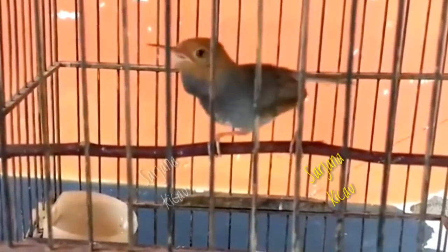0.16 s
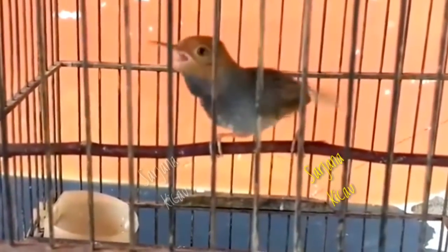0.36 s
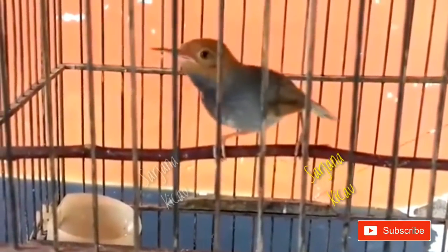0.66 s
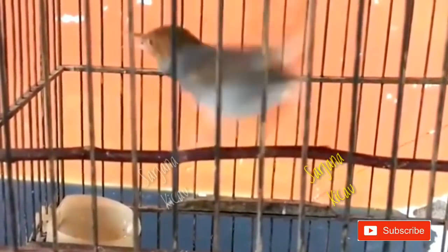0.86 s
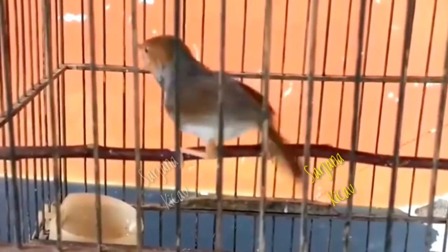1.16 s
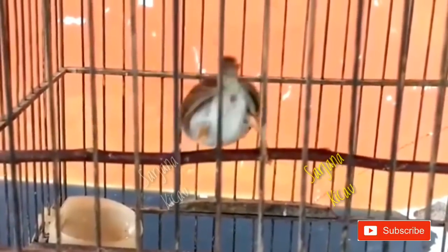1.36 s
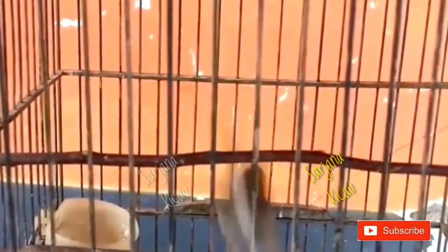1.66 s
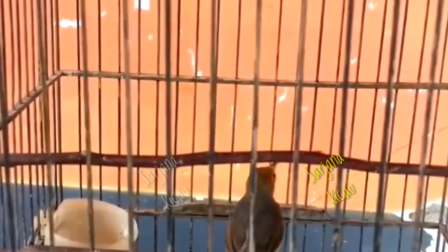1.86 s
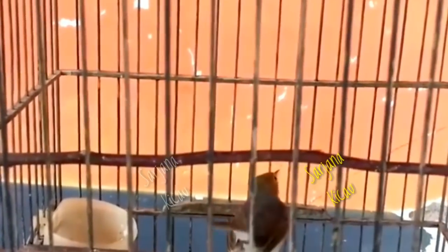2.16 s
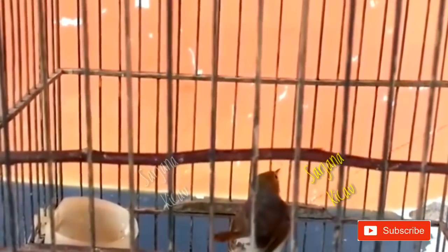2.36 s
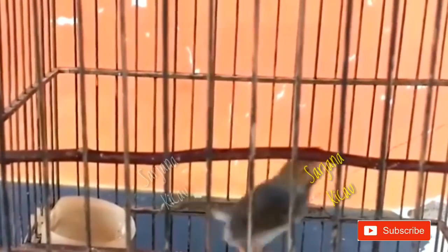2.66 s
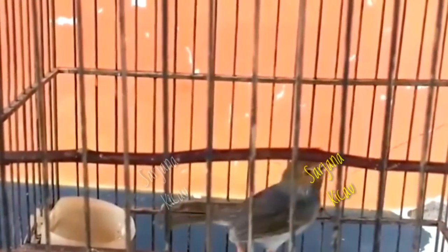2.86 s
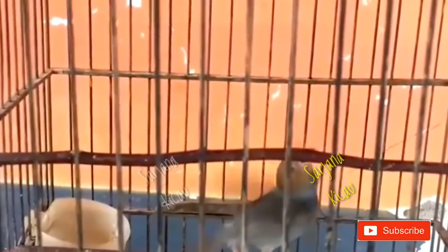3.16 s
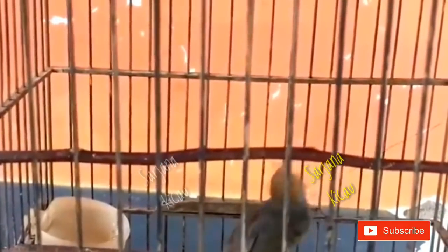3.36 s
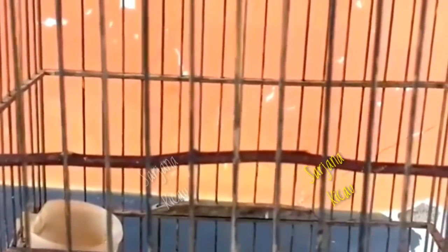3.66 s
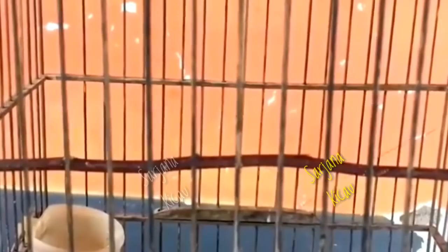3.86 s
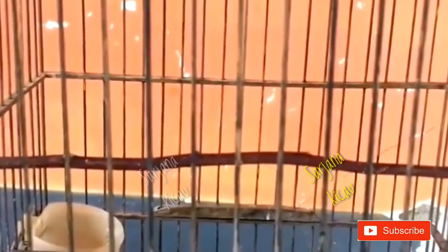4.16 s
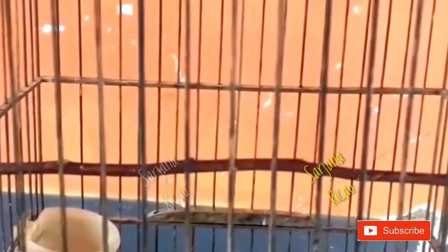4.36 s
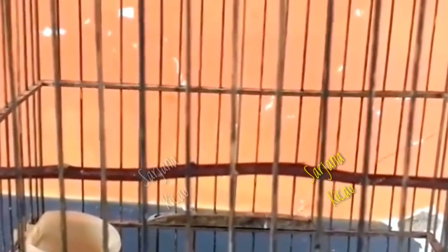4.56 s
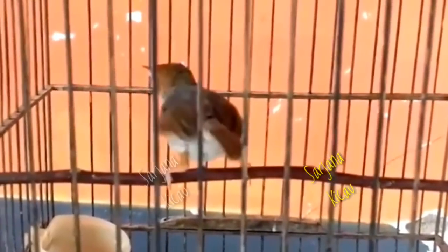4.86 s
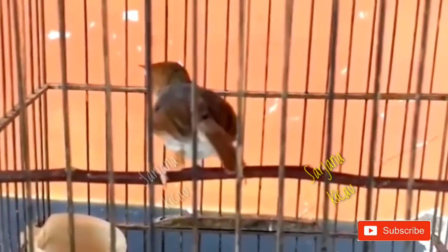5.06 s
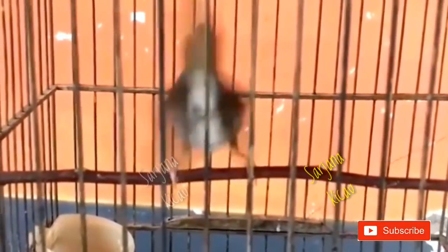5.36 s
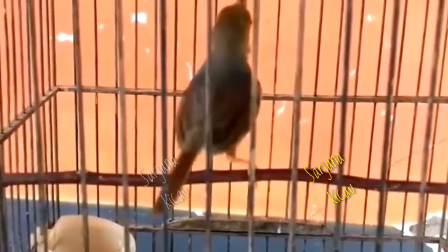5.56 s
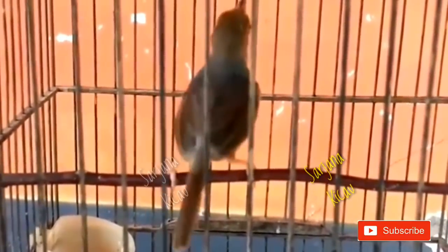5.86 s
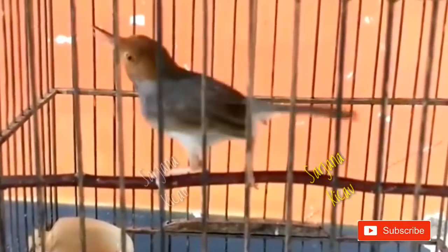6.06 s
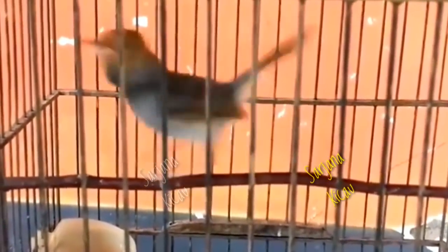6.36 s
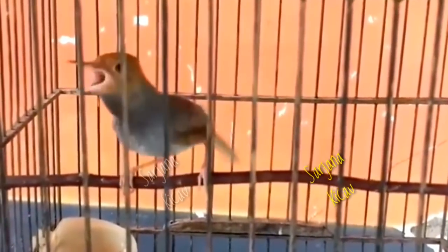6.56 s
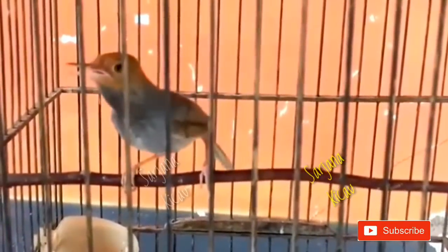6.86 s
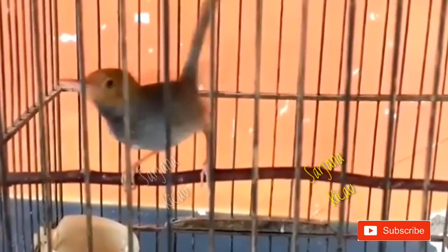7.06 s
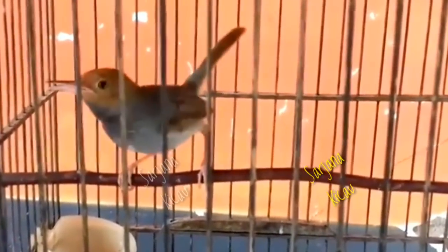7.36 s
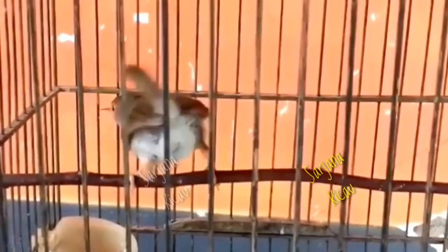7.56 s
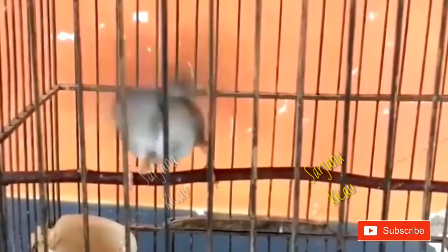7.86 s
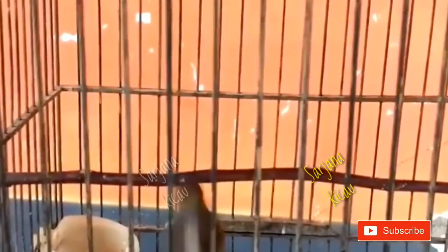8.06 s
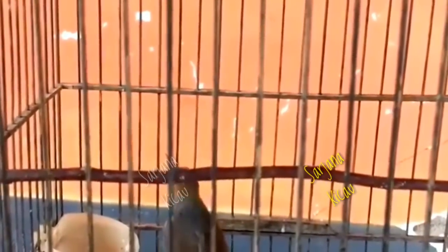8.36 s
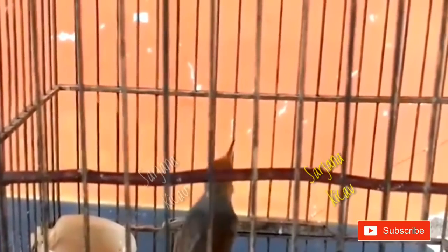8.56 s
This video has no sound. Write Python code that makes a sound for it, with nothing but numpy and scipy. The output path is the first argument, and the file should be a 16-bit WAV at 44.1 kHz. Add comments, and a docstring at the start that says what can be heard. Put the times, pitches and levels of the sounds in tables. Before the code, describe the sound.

Short, piercing songbird phrases, each a tick, rattling trill, whistle and swooping chirp, ring in a hard porch, with bill clicks and soft wing flutters.

```python
"""Caged songbird in a hard-walled porch

A small tailorbird sings close by: ticks, trills, whistles, dips, slurs and arches, each a nearly pure tone
steered along a pitch curve. Noise bursts make its bill clicks and the rasp of its trills; pressure pulses make
its wing beats. The porch echoes song and clicks, and loud notes saturate. Far off, harmonic tones make a dog's
barks and another bird's cries, falling tones make chirps, and filtered noise makes twittering and outdoor air."""
import sys
import numpy as np
from scipy import signal
from scipy.fft import rfft, irfft, next_fast_len
from scipy.io import wavfile

SR = 44100
rng = np.random.default_rng(int(sys.argv[2]) if len(sys.argv) > 2 else 0)


def master_out(mix):
    """Clip the mix to full scale and print it as 16-bit PCM to the path in sys.argv[1]."""
    frames = np.transpose(np.atleast_2d(mix))
    ceiling = np.clip(frames, -1, 1)
    pcm = np.round(ceiling * 32767).astype(np.int16)
    wavfile.write(sys.argv[1], SR, pcm)


N = 384111

# trills, sung and breathed together: onset t/s, length t/s, initial floor of the pitch f/Hz, relative level/dB
TRILL_NOTES = [(.23, .152, 2385, -6.5), (1.149, .144, 2470, -6.8), (3.118, .151, 2335, -4.8),
               (3.994, .129, 2510, -8.5), (5.594, .15, 2375, -6), (6.533, .137, 2450, -9.5),
               (8.336, .15, 2320, -6)]


def from_db(db):
    """Amplitude ratio: 20 dB is a factor of ten."""
    return 10 ** (np.asarray(db) / 20)


def rms_one(x):
    """Normalisation to unit mean power."""
    return x / np.sqrt(np.mean(x ** 2) + 1e-20)


def seconds(length):
    """Sampled time axis of a sound lasting length seconds."""
    return np.arange(int(length * SR)) / SR


def along(rows, t):
    """Linear interpolation: the columns of a curve, read at times t."""
    times, *columns = np.transpose(rows)
    return [np.interp(t, times, column) for column in columns]


def add(out, s, sound):
    """Superposition: mix a sound in at time s."""
    i = max(round(s * SR), 0)
    out[i:i + len(sound)] += sound[:max(len(out) - i, 0)]


def colour(x, points):
    """Linear filtering: scale each frequency by a curve through points of f/Hz, gain/dB."""
    size = next_fast_len(len(x))
    hz, db = np.transpose(points)
    bins = np.maximum(np.arange(size // 2 + 1) * SR / size, 1)
    gain = from_db(np.interp(np.log(bins), np.log(hz), db))
    return irfft(rfft(x, size) * gain, size)[:len(x)]


def noise(points, size=N):
    """Random pressure: white noise shaped by a spectrum, at unit mean power."""
    return rms_one(colour(rng.standard_normal(size), points))


def waver(t, per_s):
    """Random modulation: straight lines joining per_s normal random values each second."""
    knots = rng.standard_normal(int(t[-1] * per_s) + 2)
    return np.interp(t * per_s, np.arange(len(knots)), knots)


def phase_of(hz):
    """Phase is the running integral of frequency."""
    return 2 * np.pi * np.cumsum(hz) / SR


def envelope(t, attack, release):
    """Amplitude modulation: linear attack, hold, linear release."""
    return np.clip(t / attack, 0, 1) * np.clip((t[-1] - t) / release, 0, 1)


def low_pass(x, cutoff_hz):
    """Steep Butterworth attenuation above the cutoff."""
    filter_sections = signal.butter(8, cutoff_hz, fs=SR, output="sos")
    return signal.sosfilt(filter_sections, x + 1e-18)   # the offset avoids denormal numbers


def tail(t60):
    """Diffuse reverberation: noise of unit energy, built up in milliseconds and falling 60 dB in t60."""
    t = seconds(.8)
    build_up = 1 - np.exp(-(t / .007) ** 2)
    echo = rng.standard_normal(len(t)) * from_db(-60 * t / t60) * build_up
    return echo / np.sqrt(np.sum(echo ** 2))


def song():
    """Superposition of all the kinds of note."""
    # tick shape before scaling: t/s from onset, pitch f/Hz, relative level/dB
    tick_shape = [(0, 5804, -30), (.003, 5534, -6), (.006, 4897, -2.5), (.009, 4150, 4.5),
                  (.012, 3080, -10), (.016, 2500, -16), (.02, 2309, -38)]
    # ticks: onset t/s, duration ratio, pitch ratio, relative level/dB
    tick_notes = [(.2112, .82, .963, -.5), (1.1312, .95, .99, -7), (3.1005, .9, .966, -3.5),
                  (3.9752, .85, .916, -2.5), (5.5752, 1.05, .977, -2.5), (6.5138, .8, .93, -2.5),
                  (8.3045, .88, .97, -.5), (8.594, 1.04, .896, -5), (8.631, 1.6, .9, -12),
                  (8.671, 1.5, .92, -13)]
    # dips: onset t/s, pitch ratio, relative hook level/dB, relative swoop level/dB
    dip_notes = [(.55, 1, -1, -6), (1.449, .994, 0, -4), (3.432, .98, -.5, -2.5), (4.282, .99, 0, -1.5),
                 (5.8962, 1, -1, -2.5), (6.8253, 1, 0, -1.5), (8.644, .92, -1, -5.5)]
    # arches: onset t/s, pitch ratio, relative hook level/dB, relative swoop level/dB
    arch_notes = [(.764, 1, -6, -2.5), (3.888, .972, -3.5, -4.5), (6.438, .955, -7.5, -7.5)]
    ticks = sing(tick_shape, tick_notes, jitter=.04, shimmer_db=3.5)
    # a dip has a long hook and a low crest; an arch has a short hook and a high crest
    dips = swoops(dip_notes, hook_s=.026, delay_s=.029, rise_s=.022, fall_s=.05, crest_hz=3060)
    arches = swoops(arch_notes, hook_s=.016, delay_s=.035, rise_s=.028, fall_s=.04, crest_hz=3430)
    return ticks + trills() + whistles() + dips + arches + slurs()


def tone(hz, db, jitter, shimmer_db, octave_db=-46.5):
    """The syrinx as an oscillator: a sine and a weak octave, randomly modulated in pitch and level."""
    t = np.arange(len(hz)) / SR
    phase = phase_of(hz * (1 + jitter * waver(t, 600)))
    level = from_db(db + shimmer_db * waver(t, 150))
    return level * (np.sin(phase) + from_db(octave_db) * np.sin(2 * phase))


def sing(shape, notes, jitter, shimmer_db):
    """Frequency modulation along one learned shape, a little different each time."""
    out = np.zeros(N)
    for s, stretch, pitch, level_db in notes:
        t = seconds(shape[-1][0] * stretch)
        hz, db = along(shape, t / stretch)
        add(out, s, envelope(t, .001, .001) * tone(hz * pitch, db + level_db, jitter, shimmer_db))
    return out


def trills():
    """Periodic closure of the syrinx: pitch leaps in each gap, and the leaps shrink as the trill swells."""
    rate_hz, swing_hz, sag_hz = 61.3, 2400, 130   # the pitch floor sags toward the end
    swell_db, swell_share = 10.5, .66   # growth in level, over this share of the length
    closure_db, pulsed_share = 30, .87   # greatest depth of the gaps; the last pulses run together
    out = np.zeros(N)
    for s, length, low_hz, db in TRILL_NOTES:
        t = seconds(length)
        done = t / length
        lift = .5 - .5 * np.cos(2 * np.pi * rate_hz * t)
        hz = low_hz - sag_hz * done ** 2 + swing_hz * (1 - done ** 1.3) * lift ** 2
        swell = swell_db * np.minimum(done / swell_share - 1, 0)
        closure = closure_db * np.maximum(np.sin(np.pi * done / pulsed_share), 0) ** .5
        voice = tone(hz, db + swell - closure * lift, jitter=.026, shimmer_db=1.8, octave_db=-25.5)
        add(out, s, envelope(t, .001, .016) * voice)
    return low_pass(out, 5450)   # the throat damps the top


def whistles():
    """Nearly steady oscillation: short, loud, clean notes that rise slightly."""
    # whistles: onset t/s, length t/s, starting pitch f/Hz, relative level/dB
    whistle_notes = [(.4424, .046, 3355, 1), (1.3431, .043, 3345, 2), (3.326, .05, 3405, 1.5),
                     (4.176, .046, 3385, 2), (5.791, .045, 3325, 2.5), (6.7212, .046, 3360, 1.5),
                     (8.536, .053, 3355, -.5)]
    rise_hz_per_s = 3800
    out = np.zeros(N)
    for s, length, start_hz, db in whistle_notes:
        t = seconds(length)
        voice = tone(start_hz + rise_hz_per_s * t, db, jitter=.001, shimmer_db=.75)
        add(out, s, envelope(t, .002, .009) * voice)
    return out


def low_voice(hz, pitch, db):
    """Pitch-dependent strength: a rougher tone that weakens at the bottom of its range."""
    full_voice_hz, loss_db_per_hz = 2850, .021   # full strength above this unscaled pitch
    loss_db = loss_db_per_hz * np.maximum(full_voice_hz - hz, 0)
    return tone(hz * pitch, db - loss_db, jitter=.014, shimmer_db=3.2)


def swoops(notes, hook_s, delay_s, rise_s, fall_s, crest_hz):
    """Frequency glides: a falling hook, then a swoop up to a crest and partly down again."""
    # pitches before each note's ratio
    hook_hz, hook_fall_hz_per_s = 3300, 64000
    from_hz, to_hz = 1400, 2560
    fade_db = 3   # weakening after the crest
    out = np.zeros(N)
    for s, pitch, hook_db, swoop_db in notes:
        t = seconds(hook_s)
        hook = low_voice(hook_hz - hook_fall_hz_per_s * t, pitch, hook_db)
        add(out, s, envelope(t, .003, .005) * hook)
        t = seconds(rise_s + fall_s)
        up = from_hz + (crest_hz - from_hz) * np.sin(np.pi / 2 * t / rise_s)
        down = to_hz + (crest_hz - to_hz) * np.cos(np.pi / 2 * (t - rise_s) / fall_s) ** 2
        fade = fade_db * np.maximum(t - rise_s, 0) / fall_s
        swoop = low_voice(np.where(t < rise_s, up, down), pitch, swoop_db - fade)
        add(out, s + delay_s, envelope(t, .003, .014) * swoop)
    return out


def slurs():
    """Exponential relaxation of pitch: an upward flick, a break, then a note settling from above."""
    # slurs: onset t/s, length of the held part t/s, held pitch f/Hz, relative start level/dB, end level/dB
    slur_notes = [(.554, .143, 3700, -4, -18), (3.666, .142, 3690, -2, .5), (6.22, .161, 3720, -3, -10)]
    flick_s, flick_from_hz, flick_to_hz, flick_db = .013, 2700, 4400, 2.5
    delay_s, overshoot_hz, settle_s = .0235, 1120, .018
    push_db, push_before_end_s, push_width_s = 8, .028, .018   # a last push of air
    out = np.zeros(N)
    for s, length, held_hz, start_db, end_db in slur_notes:
        t = seconds(flick_s)
        flick_hz = np.linspace(flick_from_hz, flick_to_hz, len(t))
        flick = tone(flick_hz, start_db + flick_db, jitter=.004, shimmer_db=1.1)
        add(out, s, envelope(t, .01, .003) * flick)
        t = seconds(length)
        push = push_db * np.exp(-((length - push_before_end_s - t) / push_width_s) ** 2)
        db = np.linspace(start_db, end_db, len(t)) + push
        hz = held_hz + overshoot_hz * np.exp(-t / settle_s)
        held = tone(hz, db, jitter=.0036, shimmer_db=1.1)
        add(out, s + delay_s, envelope(t, .003, .012) * held)
    return out


def rasp():
    """Turbulence: air rushing through the syrinx makes band noise that fades through each trill."""
    # spectrum of the rush: f/Hz, relative level/dB
    rush_spectrum = [(1500, -39.5), (2600, -10), (3500, -2.5), (4400, -0.5), (5400, -6), (6000, -35),
                     (15000, -60.5)]
    rasp_db, fade_db = -23.5, 9.5   # level relative to the trill's, and its loss by the end
    out = np.zeros(N)
    for s, length, _, db in TRILL_NOTES:
        t = seconds(length)
        level = from_db(rasp_db + db - fade_db * t / length)
        add(out, s, level * envelope(t, .012, .012) * noise(rush_spectrum, size=len(t)))
    return out


def bill():
    """Impulsive excitation: each snap is a bright noise burst of milliseconds with a faint ring."""
    # clicks: onset t/s, relative level/dB
    snaps = [(0.0704, -17), (.087, -17), (.102, -13), (.118, -10.5), (0.136, -10), (8.163, -12),
             (8.18, -14), (8.195, -10), (8.211, -17), (8.225, -11)]
    # spectrum of a click before the low-pass: f/Hz, relative level/dB
    snap_spectrum = [(500, -32), (1500, -23), (3300, -13.5), (4200, 8), (5600, -2.5), (6500, -13),
                     (7400, -40.5), (14000, -54)]
    decay_s, ring_db, ring_s = .0018, -15.5, .009
    out, t = np.zeros(N), np.arange(SR // 20) / SR
    fade = np.exp(-t / decay_s) + from_db(ring_db) * np.exp(-t / ring_s)
    for s, db in snaps:
        add(out, s, .45 * from_db(db) * fade * noise(snap_spectrum, size=len(t)))
    return low_pass(out, 6400)


def porch(x):
    """Room impulse response: direct sound, two near reflections, a quick dense echo and a longer faint one."""
    # near surfaces: delay t/s, relative level/dB
    reflections = [(.0043, -18), (.0094, -13)]
    # colour of the diffuse echo: f/Hz, gain/dB
    echo_spectrum = [(100, -9.5), (1200, 5.5), (2500, -5.5), (4200, 1), (5400, 0.5), (7000, -8.5),
                     (15000, -18.5)]
    early = from_db(-8.5) * tail(.25)
    late = from_db(-21) * tail(.5559)
    response = colour(early + late, echo_spectrum)
    response[0] += 1   # direct sound
    for s, db in reflections:
        add(response, s, from_db([db]))
    return signal.oaconvolve(x, response)[:N]


def wings():
    """Near-field air flow: each beat pushes and pulls the air at the microphone and leaves a short draught."""
    # wing beats: t/s, relative level/dB
    beats = [(6.219, -55), (6.29, -44), (6.371, -53.5), (6.439, -55), (6.601, -53.5), (7.736, -46.5),
             (7.827, -37), (7.847, -38.5), (7.884, -41), (7.955, -47), (8.004, -41)]
    # spectrum of the draught: f/Hz, relative level/dB
    draught_spectrum = [(30, -22), (95, 0), (180, -5), (400, -30), (1500, -70)]
    puff_s, draught_db, draught_s = .0015194, -13, .03
    out, t = np.zeros(N), seconds(.15)
    u = np.arange(-SR // 50, SR // 50) / SR / puff_s   # time in puff widths
    puff = 2 * u * np.exp(-u ** 2 / 2)
    draught = np.exp(-t / draught_s) * envelope(t, .008, .02)
    for s, db in beats:
        add(out, s - len(u) / SR / 2, from_db(db) * puff)
        add(out, s, from_db(db + draught_db) * draught * noise(draught_spectrum, size=len(t)))
    return out


def far_dog(rough=.015, pitch_spread=.08):
    """Source and filter: hoarse arched barks and one long whine, heard only as their echo."""
    # bark shape before random pitch changes: t/s from onset, pitch f/Hz, relative level/dB
    bark_shape = [(0, 182.3, -14), (.04, 203.4, 6.5), (.1, 215.7, 1.5), (.16, 204, -4.5), (.23, 180, -25)]
    # resonances of the bark: f/Hz, gain/dB
    bark_spectrum = [(250, -24), (550, -13), (700, -20), (860, 1.5), (1050, 1), (1270, -4.5), (1500, -19.5),
                     (2500, -31.5)]
    # bouts at an even pace: first bark t/s, number of barks, time between barks t/s
    bark_bouts = [(.85, 2, .3), (1.62, 7, .31), (4.38, 5, .31), (5.9, 3, .29), (7.0, 6, .293)]
    # loudness of the barking: t/s, relative level/dB
    bark_loudness = [(.85, -62), (1.15, -59), (1.65, -71.5), (2.5, -68.5), (3.15, -56.5), (5, -62.5),
                     (5.6, -56), (7.6, -60), (8.3, -47.5)]
    # the whine: onset t/s, length t/s, starting pitch f/Hz, ending pitch f/Hz, relative level/dB
    long_whine = (.72, .7, 1035, 990, -59)
    t = seconds(bark_shape[-1][0])
    hz, db = along(bark_shape, t)
    out = np.zeros(N)
    for first, count, period in bark_bouts:
        for s in first + period * np.arange(count):
            # each bark has a pitch of its own
            pitch = 1 + pitch_spread * rng.uniform(-1, 1) + rough * waver(t, 200)
            phase = phase_of(hz * pitch)
            voice = colour(sum(np.cos(k * phase) for k in range(2, 8)), bark_spectrum)
            add(out, s, from_db(along(bark_loudness, s)[0] + db) * rms_one(voice))
    s, length, start_hz, end_hz, db = long_whine
    t = seconds(length)
    whine = tone(np.linspace(start_hz, end_hz, len(t)), db, jitter=.02, shimmer_db=3)
    add(out, s, envelope(t, .12, .2) * whine)
    return signal.oaconvolve(out, tail(.4))[:N]


def far_birds(yard_t60=.48, direct_db=-2):
    """Reverberant distance: cries and falling chirps half lost in echo, over a wash of twittering."""
    # chirp shape before scaling: t/s from onset, pitch f/Hz, relative level/dB
    chirp_shape = [(0, 4706, -13), (.04, 4400, 7), (.085, 4069, 0.5), (.125, 3100, -9.5),
                   (.15, 2800, -26.5)]
    # chirps: onset t/s, duration ratio, pitch ratio, relative level/dB
    chirp_notes = [(1.79, 1.3, .984, -69), (2.26, 1.5, .99, -65), (2.42, 1.3, .973, -69),
                   (2.769, 1.1, .96, -57), (2.92, 1.2, .905, -64), (4.68, 1.4, .85, -62),
                   (7.68, 1.2, .968, -62.5), (7.86, 1.3, .974, -65)]
    # twittering, blurred by distance: t/s, level/dB
    twitter_level = [(0, -63), (1.8, -66), (2.15, -73), (2.7, -65), (5.2, -68), (7.2, -63.5), (8.71, -62)]
    # spectrum of the twittering: f/Hz, relative level/dB
    twitter_spectrum = [(2000, -36.5), (3000, -10), (4000, -3.5), (4600, -5.5), (5500, -25), (7000, -41.5)]
    calls = far_cry() + sing(chirp_shape, chirp_notes, jitter=.028, shimmer_db=4.5)
    echo = signal.oaconvolve(calls, tail(yard_t60))[:N]
    twitter = from_db(along(twitter_level, np.arange(N) / SR)[0]) * noise(twitter_spectrum)
    return from_db(direct_db) * calls + echo + twitter


def far_cry(jitter=.0073, quaver_db=5):
    """Additive synthesis: thin, gliding nasal cries whose high partials quaver separately."""
    # cries: onset t/s, length t/s, starting pitch f/Hz, ending pitch f/Hz, relative level/dB
    cry_notes = [(5.33, .28, 625, 597, -49), (5.66, .135, 577, 599, -45.5), (5.95, .09, 598, 590, -50)]
    # partials: multiple of the pitch, relative level/dB
    cry_partials = [(4, -19), (5, -24), (6, -16), (7, -4), (8, 5.5), (9, -17), (10, -12), (11, -25),
                    (12, -18)]
    fade_s = .06
    out = np.zeros(N)
    for s, length, start_hz, end_hz, db in cry_notes:
        t = seconds(length)
        glide_hz = np.linspace(start_hz, end_hz, len(t))
        phase = phase_of(glide_hz * (1 + jitter * waver(t, 100)))
        voice = np.zeros(len(t))
        for k, partial_db in cry_partials:
            voice += from_db(partial_db + quaver_db * waver(t, 29)) * np.sin(k * phase)
        add(out, s, from_db(db) * envelope(t, fade_s, fade_s) * voice)
    return out


def outdoor_air():
    """Broadband ambience: shaped noise whose level drifts."""
    # spectrum of the background: f/Hz, relative level/dB
    air_spectrum = [(20, -12.5), (45, -7), (70, -3), (100, -5), (200, -9.5), (400, -12), (900, -6),
                    (1500, -11.5), (3000, -21), (6000, -28.5), (11000, -36), (15000, -43)]
    # loudness of the background: t/s, level/dB
    air_loudness = [(0, -62.5), (1.3, -61.5), (1.7, -69), (2.3, -70), (2.9, -57.5), (4.2, -59.5),
                    (4.75, -65.5), (6.3, -55), (7.5, -64.5), (8.71, -51.5)]
    return from_db(along(air_loudness, np.arange(N) / SR)[0]) * noise(air_spectrum)


def scene():
    """Superposition: the bird in its porch, with the neighbourhood behind it."""
    bird = porch(song() + rasp() + bill())
    return (bird + wings() + far_dog() + far_birds() + outdoor_air())[None]


def record(dry):
    """Saturation: clipping adds odd harmonics to loud notes; then the top of the band is cut."""
    clip_top, hardness, cutoff_hz = .69486, 20., 15700
    clipped = dry / (1 + np.abs(dry / clip_top) ** hardness) ** (1 / hardness)
    top_cut = signal.ellip(10, .1, 80, cutoff_hz, fs=SR, output="sos")
    return signal.sosfilt(top_cut, clipped)


dry = scene()
out = record(dry)
master_out(out)
```